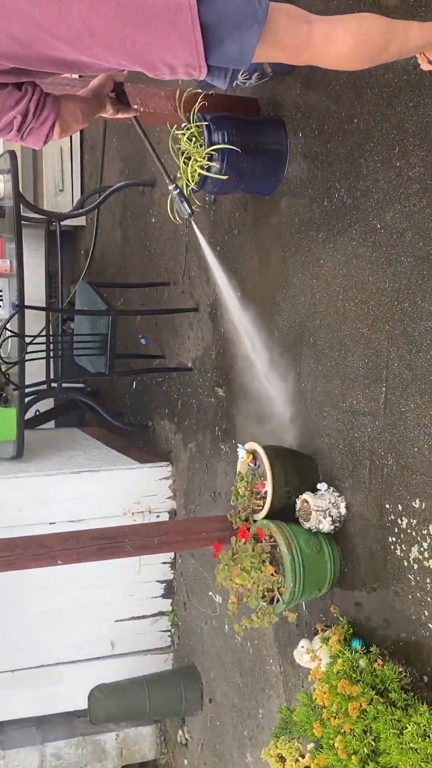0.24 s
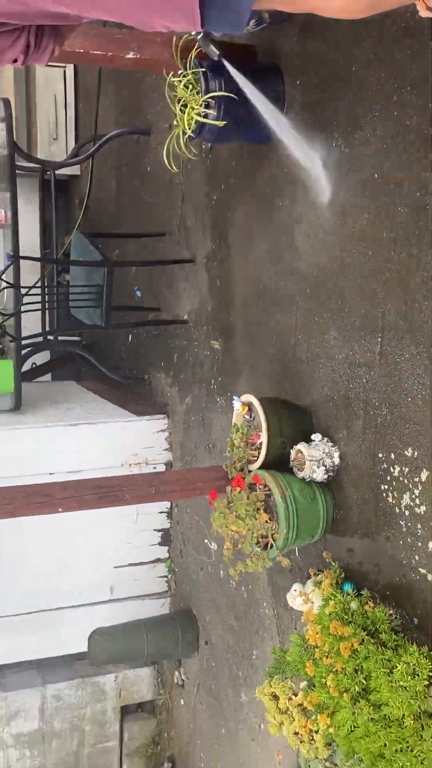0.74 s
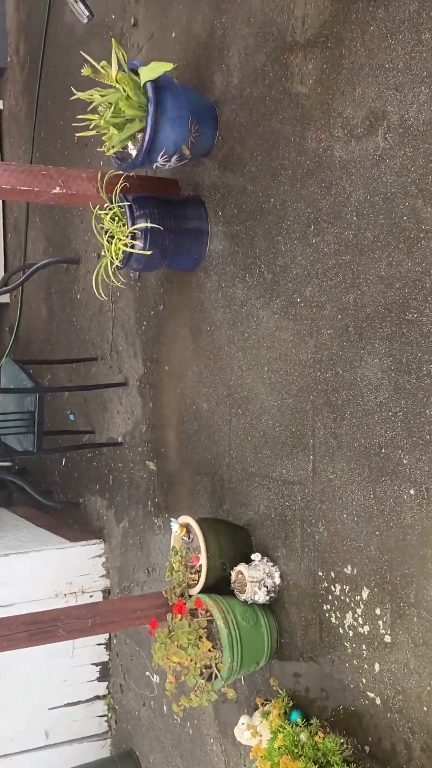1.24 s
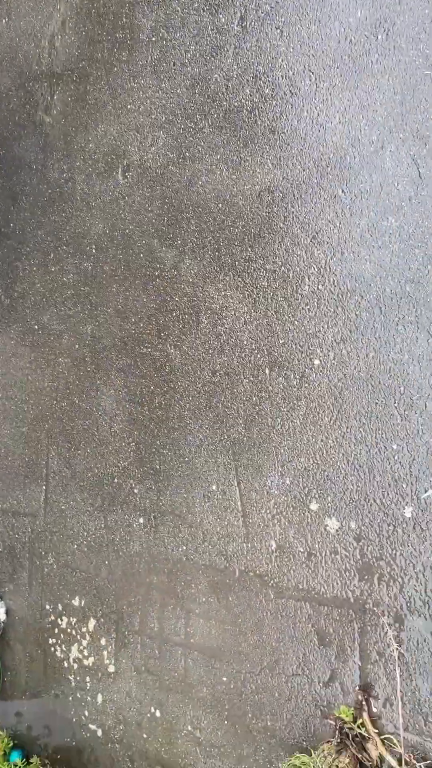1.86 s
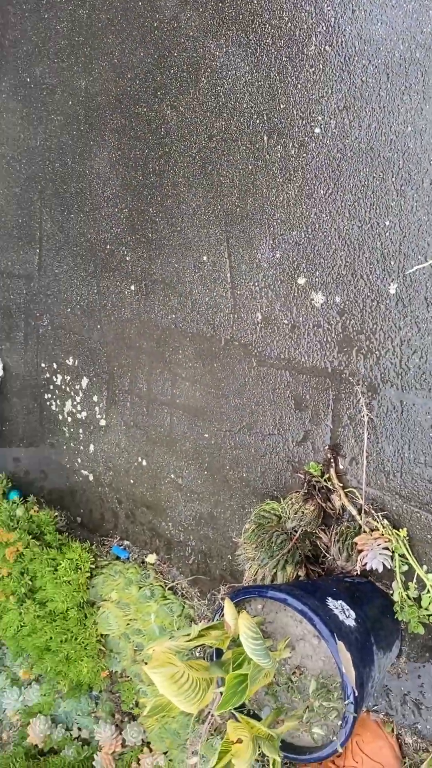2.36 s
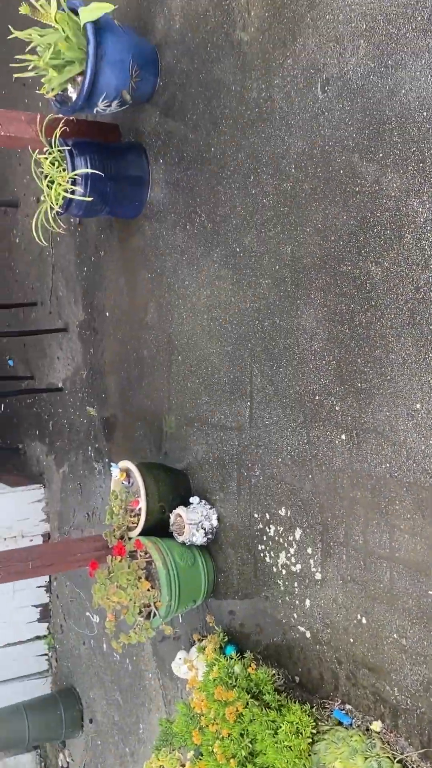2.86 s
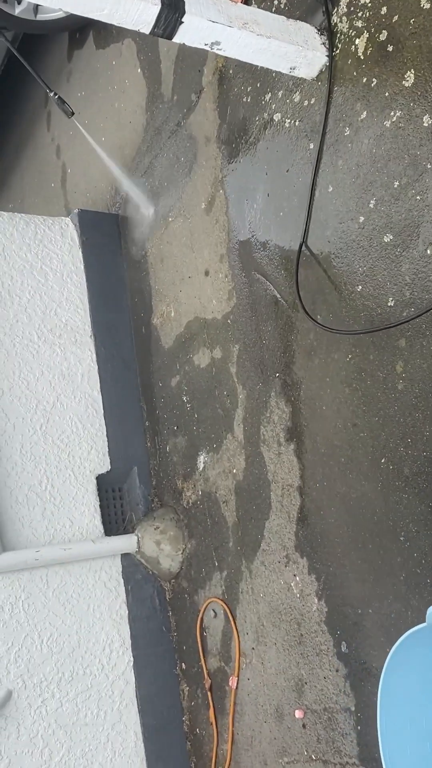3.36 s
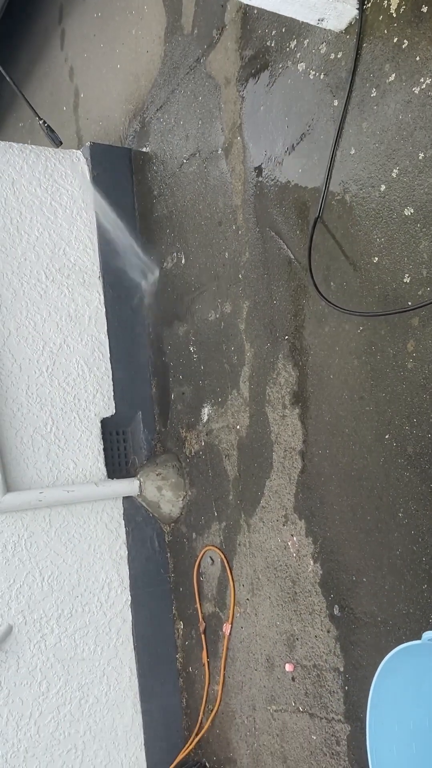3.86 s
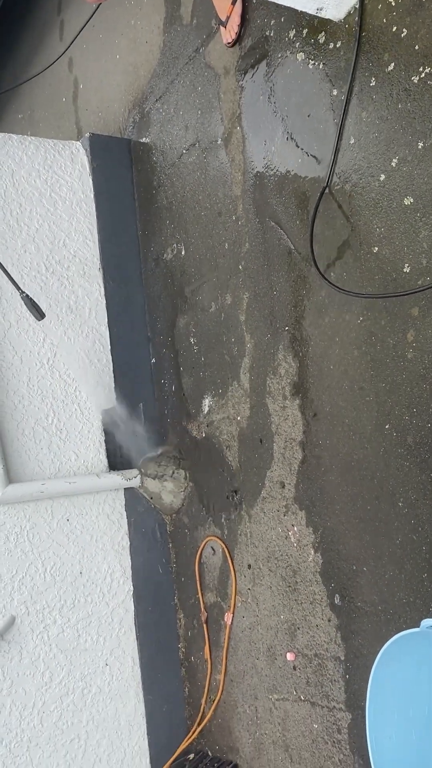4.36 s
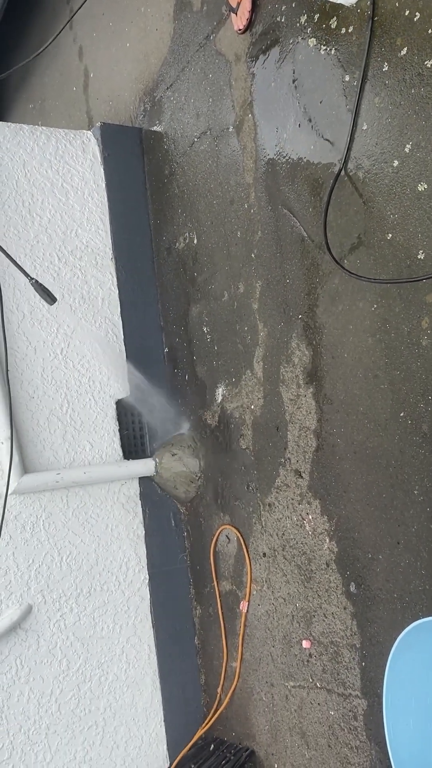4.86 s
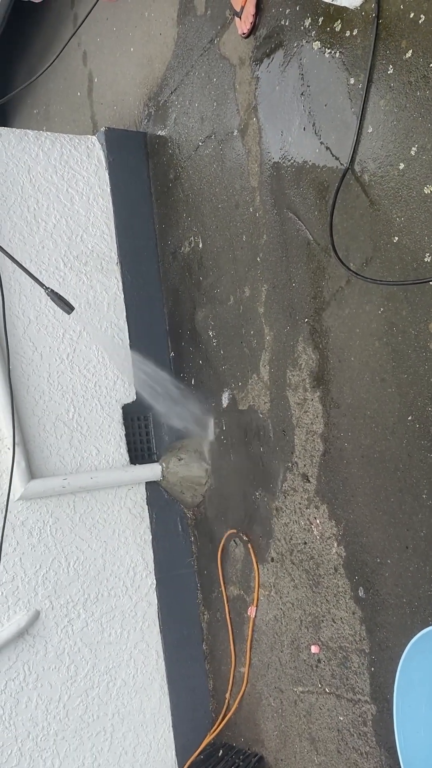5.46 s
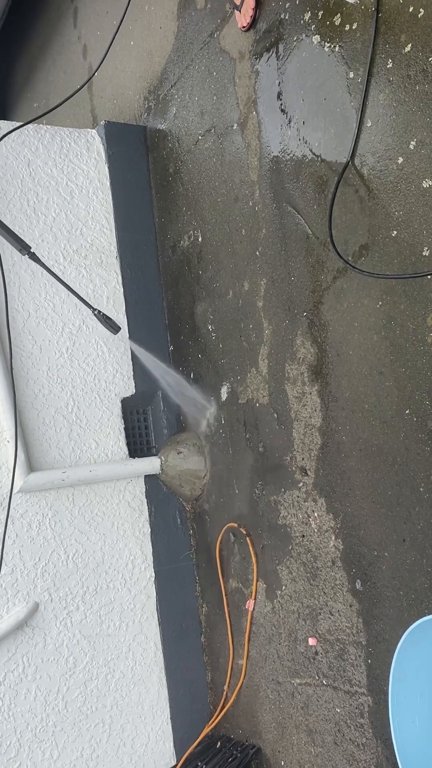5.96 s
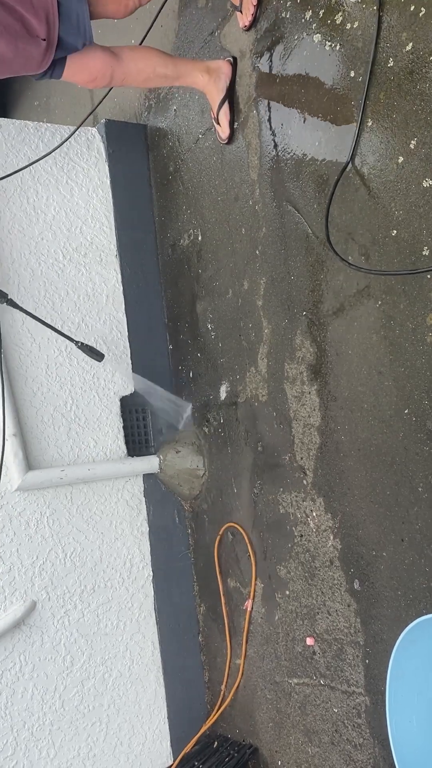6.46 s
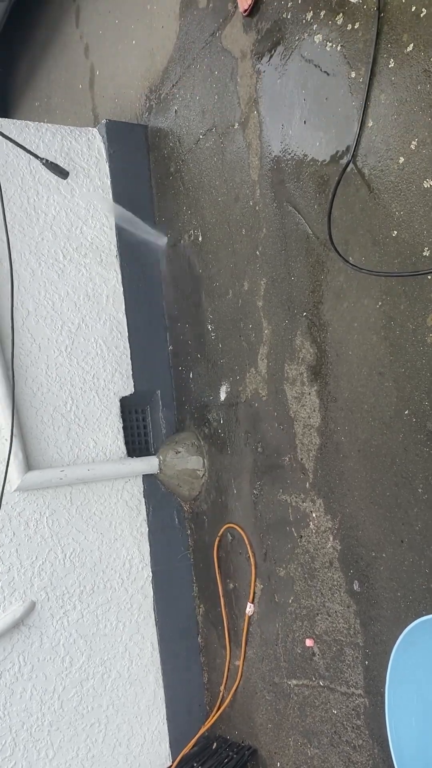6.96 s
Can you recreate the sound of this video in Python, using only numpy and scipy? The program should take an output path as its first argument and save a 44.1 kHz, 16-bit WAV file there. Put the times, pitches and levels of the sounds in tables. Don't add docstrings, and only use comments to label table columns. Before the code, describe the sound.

Outdoors, a pressure washer's jet hisses on concrete, cuts out for two seconds of gritty scuffs and plastic knocks, then whines loudly close by.

```python
import sys
import numpy as np
from scipy import signal
from scipy.fft import rfft, irfft, next_fast_len
from scipy.io import wavfile
from scipy.ndimage import uniform_filter1d

SR = 44100
rng = np.random.default_rng(int(sys.argv[2]) if len(sys.argv) > 2 else 0)


def output_pcm(signal):
    pcm = np.clip(np.atleast_2d(signal).T, -1, 1) * 32767
    wavfile.write(sys.argv[1], SR, np.round(pcm).astype(np.int16))


def volts_from_decibels(level):
    exponent = np.asarray(level, float) / 20
    return 10 ** exponent


N = 318402
TIME = np.arange(N) / SR
AIR = []


# start_s, rise_s, stop_s, case_db, jet_db
FAR_RUN = (-.01, .01, 1.035, -38.4, -36.5)
# pitch_hz, level_db, side_minus_mid_db
FAR_LINES = [(282.4, -56.5, -31.0), (832, -54.5, -14.0), (1112, -52.5, -17), (1226, -54, -16.0),
             (1397, -55, -21.0), (1507, -52, -4), (1674.0, -53, -3), (1934, -55.0, -2), (2095, -62, 5),
             (2590, -56.0, -3.0), (2664.0, -58, -3.0), (2793.0, -59, -6.0), (3354.0, -59.0, -11),
             (4192.0, -63.0, -7)]
# pitch_hz, level_db (per Hz)
FAR_CASE = [(88, -42), (150, -13.5), (270, -4), (605, -8), (1370, 0.5), (1820, -3), (1960, -6.5),
            (2400, -3), (2580, -11), (2910, -8.5), (5000, -21), (6500, -44), (11000, -120)]
# pitch_hz, width_hz, level_db
FAR_MODES = [(1130, 51, 1), (1250, 71, 3), (1420, 66, 1.5), (1670, 60, 2), (1800, 80, -1.5), (1960, 120, 2),
             (2450, 80, -3.5), (2580, 110, 5)]
# pitch_hz, level_db (per Hz)
FAR_JET = [(2060, -15), (3500, -2), (4340, -1.5), (4810, -2), (7800, -0.5), (14000, 2.5), (15750, 1.5),
           (16000, -23)]
# pitch_hz, side_minus_mid_db
FAR_SIDE = [(60, -15), (200, -18), (700, -13), (1290, -10), (2380, -2.5), (4400, -1.5), (7000, -4),
            (8000, -15), (8800, -23), (15000, -50)]


def far_washer():
    lines = [(hz, db, side_db, 0) for hz, db, side_db in FAR_LINES]
    return washer(FAR_RUN, lines, FAR_CASE, FAR_MODES, FAR_JET, FAR_SIDE,
                  case_share_db=-1.5, swell_db=1.0)


# start_s, rise_s, stop_s, case_db, jet_db
NEAR_RUN = (3.046, .028, 9, -28.4, -33)
NEAR_LINE_HZ = [279.6, 400, 559, 679.5, 838.5, 1118.8, 1303, 1398.4, 1506.4, 1677.9, 1783.5, 1956.8, 2211.7,
                2356, 2514, 2901, 3360, 3463, 3628, 3908, 4195, 5030, 7784]
# level_db, side_minus_mid_db, extra_db (until the phone settles)
NEAR_LINES = [(-42, -51, 0.5), (-49.5, -31, 2), (-55.5, -13, 0), (-54.5, -15, 0), (-50.5, -5, 7),
              (-40, -16, -4), (-54, -25, 6), (-41, -14, -3), (-39.5, -16, -4), (-40, -18, -7),
              (-43, -14, 2), (-45.5, 3, 0.5), (-52, -14, 3), (-62, -8, -2), (-48.5, -2, -1),
              (-46, -13, 0.5), (-51, -10, 0), (-54, -9, -3), (-50, -9, 0), (-55, -6, 2), (-49, -8, 1),
              (-53, -1, 2), (-59, -15, 2)]
# pitch_hz, level_db (per Hz)
NEAR_CASE = [(88, -88), (150, -22.5), (226, -20.5), (274, -12.5), (341, -13.5), (395, -15), (613, -13.5),
             (1040, -6), (1100, -4), (1280, -8.5), (1460, -2), (2070, -5.5), (5000, -15), (6500, -49),
             (11000, -120)]
# pitch_hz, width_hz, level_db
NEAR_MODES = [(1060, 20, 0), (1182, 59, 2), (1393, 60, 5.5), (1504, 38, 5.5), (1603, 57, -6), (1680, 50, 3),
              (1730, 35, 2.5), (1920, 25, 3), (2000, 80, -6.5), (2260, 66, 1.5), (2270, 36, -8.5),
              (3200, 85, 3), (12000, 200, 2.5), (7780, 90, 5), (8110, 50, 3)]
# pitch_hz, level_db (per Hz)
NEAR_JET = [(2060, -20), (3500, -2.5), (4160, -5), (4780, -7), (5190, 0), (7040, -2), (7850, -5),
            (8910, -4), (13000, 0), (15750, -0.5), (16000, -26)]
# pitch_hz, side_minus_mid_db
NEAR_SIDE = [(60, -21), (200, -45), (500, -24), (800, -16), (1290, -14), (2000, -8.5), (4400, -6),
             (7000, 0), (8000, -10), (8800, -11.5), (15000, -17.5)]


def near_washer():
    lines = [(hz, *strength) for hz, strength in zip(NEAR_LINE_HZ, NEAR_LINES)]
    return washer(NEAR_RUN, lines, NEAR_CASE, NEAR_MODES, NEAR_JET, NEAR_SIDE,
                  case_share_db=-3.5, swell_db=1.5)


def washer(run, lines, case, modes, jet, side_table, case_share_db, swell_db):
    sway_db, recede_db_per_s, jet_shut_db_per_s = 0.4, 0.2, 240
    run_down_db_per_s, brake_db_per_s2 = 80, 650
    start, rise, stop, case_db, jet_db = run
    on = np.clip((TIME - start) / rise, 0, 1)
    since_stop = np.maximum(TIME - stop, 0)
    run_down_db = (run_down_db_per_s + brake_db_per_s2 * since_stop) * since_stop
    load = on * volts_from_decibels(sway_db * walk(3) - recede_db_per_s * (TIME - start) - run_down_db)
    flow = on * volts_from_decibels(sway_db * walk(3) - jet_shut_db_per_s * since_stop)
    heard = slice(*np.flatnonzero(load > 1e-3)[[0, -1]])
    tones = motor(lines, heard, wobble=0.001215, rough_db=2, swell_db=swell_db) * load
    rattle = aim(unit(hiss(case, 1.0, 6), 730, 2200)) * load * volts_from_decibels(case_db + case_share_db)
    spray = aim(unit(hiss(jet, 0.63, 9), 4400, 14800)) * flow * volts_from_decibels(jet_db)
    mid, other = shape(rattle + spray, [(20, 0), (20000, 0)], modes)
    return tones + widen(mid, side_table, other)


# time_s, level_db
WALL_ECHO = [(3.6, 0), (4.8, -1), (5.3, -5), (5.9, -7), (6.15, 1), (6.35, 4.5), (6.6, 1.5), (7.2, -1)]


def motor(lines, span, wobble, rough_db, swell_db):
    settled_s, settling_s = 3.66, 0.34
    time = TIME[span]
    turn = (np.cumsum(1 + wobble * (walk(3) + walk(25))) / SR)[span]
    unsettled = np.clip((settled_s - time) / settling_s, 0, 1)
    out = np.zeros((2, N))
    for hz, db, side_db, early_db in lines:
        unsteady = min(hz / 1300, 1)
        smear = 0.55 * hz / 1500 * walk(40)[span]
        phase = 2 * np.pi * (hz * turn + rng.random()) + smear
        load = (walk(2.95, unsteady * swell_db) * walk(30, unsteady * rough_db))[span]
        load = load * (1 + (volts_from_decibels(early_db) - 1) * unsettled)
        if 500 < hz < 900 and hz % 280 > 270:
            load = load * volts_from_decibels(np.interp(time, *np.transpose(WALL_ECHO), left=0))
        gain = np.sqrt(2) * volts_from_decibels(db) * load
        mid = gain * np.sin(phase)
        side = gain * volts_from_decibels(side_db) * np.cos(phase)
        out[:, span] += [mid + side, mid - side]
    return out


# time_s, roar_db (on the concrete), bite_db (of the spray)
AIM = [(0, -.5, 0), (.3, 0, -1.5), (.55, 0, -1), (.85, 0, 1.5), (1, 0, .5), (3.1, 1.5, 1.5), (3.4, 0, 2),
       (4.2, -.5, .8), (4.7, .3, -.8), (5.3, -2, .1), (5.7, -2, .3), (6.15, -4.5, 1), (6.4, -1.5, 1),
       (6.8, .2, .1), (7.2, .2, .1)]


def aim(x):
    s, roar_db, bite_db = np.transpose(AIM)
    for db, band_hz in ((roar_db, [350, 1000]), (bite_db, [4000, 8000])):
        sos = signal.butter(1, band_hz, "bandpass", fs=SR, output="sos")
        part = signal.sosfilt(sos, x)
        x = x + part * (volts_from_decibels(np.interp(TIME, s, db)) - 1)
    return x


# start_s, end_s, level_db, pitch_hz, width_hz
VALVE = (1.074, 1.12, -46, 14200, 1100)


def valve():
    start, end, db, hz, width = VALVE
    whistle = shape(rng.standard_normal(N), [(20, -40), (20000, -40)], [(hz, width, 40)])
    gate = np.sin(np.pi * np.clip((TIME - start) / (end - start), 0, 1))
    return volts_from_decibels(db) * gate * whistle / np.std(whistle)


# start_s, level_db, pitch_hz, t60_s, damped_at_s
PUMP_RING = (1.06, -46.5, 1150, .9, 1.195)


def pump_ring():
    out, t = np.zeros(N), TIME[:16384]
    s, db, hz, t60, damped = PUMP_RING
    tone = ring(t, hz, t60) * walk(150)[:len(t)] + 0.6 * ring(t, hz, t60)
    gate = np.clip(np.minimum(t, damped - s - t) / 0.02, 0, 1)
    add(out, s, volts_from_decibels(db) * tone * gate)
    return out


# peak_s, peak_db, centre_hz, t60_s
SCUFFS = [
    (1.3444, -34, 7000, 0.07),
    (1.4905, -28.5, 8400, 0.031),
    (1.637, -29, 11000, 0.049),
    (1.7764, -27, 10800, 0.027),
    (1.939, -32.5, 11000, 0.047),
    (2.0737, -45, 10900, 0.06),
    (2.6794, -47, 9880, 0.03),
    (2.7105, -44, 8640, 0.066),
    (2.7776, -42, 9080, 0.056),
]
# peak_s, peak_db, centre_hz
FAINT_SCUFFS = [
    (1.4366, -53, 12800),
    (1.5773, -50, 14800),
    (1.722, -52, 13600),
    (1.8544, -55, 5070),
    (1.9964, -52, 11300),
    (2.173, -58, 8440),
    (2.3261, -48, 5650),
    (2.4289, -48, 8470),
    (2.495, -48, 5520),
    (2.6529, -43, 7000),
]
# peak_s, peak_db, centre_hz, t60_s
DRAGS = [
    (1.128, -42, 4600, 0.04),
    (1.2675, -49.5, 13100, 0.12),
    (1.3694, -50, 7550, 0.11),
    (2.09, -34.5, 7750, 0.042),
    (2.2482, -33, 6360, 0.15),
    (2.608, -39.5, 8300, 0.12),
    (2.9343, -32, 8700, 0.083),
    (2.9694, -42.5, 7300, 0.12),
]


def sole_on_grit():
    out = np.zeros(N)
    for s, db, hz, t60 in SCUFFS:
        add(out, s, scuff(db - 9.0, hz, t60, swell_ms=4.0, hold=0.0013, wide=0.78))
    for s, db, hz in FAINT_SCUFFS:
        add(out, s, scuff(db - 9.0, hz, t60=0.08, swell_ms=3.0, hold=0.0013, wide=0.78))
    for s, db, hz, t60 in DRAGS:
        add(out, s, scuff(db - 11.5, hz, t60, swell_ms=0.6, hold=0.013, wide=0.95))
    return np.roll(out, -int(0.028 * SR))


def scuff(db, hz, t60, swell_ms, hold, wide):
    t = TIME[:8192] - 0.03
    bins = np.arange(4097) * SR / 8192 + 1
    swell = np.exp(t * 1000 / max(swell_ms, 0.5))
    decay = np.exp(-np.log(1000) * (t - hold) / t60)
    envelope = np.minimum(np.minimum(swell, decay), 1)
    crackle = volts_from_decibels(2.1 * np.repeat(rng.exponential(size=256), 32))
    colour = np.exp(-(np.log(bins / hz) / 0.19) ** 2) + wide / (1 + (5500 / bins) ** 6)
    scrape_db = -1 - 16 * np.log2(hz / 5000)
    colour += volts_from_decibels(scrape_db) * np.exp(-(np.log(bins / 3200) / 0.6) ** 2)
    colour *= volts_from_decibels(3.5 * np.interp(bins, np.arange(24) * 1000, rng.standard_normal(24)))
    noise = crackle * irfft(rfft(rng.standard_normal(len(t))) * colour, len(t))
    return volts_from_decibels(db) * envelope * noise / np.std(noise)


# start_s, peak_db, pitch_hz
GRAINS = [(1.3514, -38, 7120), (1.4661, -47, 13900), (1.4925, -34, 9000), (1.6304, -34, 11500),
          (1.6382, -21, 9500), (1.6454, -33, 12800), (1.6594, -41, 10500), (1.7724, -27, 11000),
          (1.7784, -21, 10800), (1.8024, -46, 11100), (1.9365, -30, 10600), (1.939, -26, 11000),
          (1.9964, -45, 11300), (2.0737, -46, 7530), (2.0906, -28, 7620), (2.1034, -36, 8050),
          (2.2154, -48, 15000), (2.2478, -46, 6360), (2.2964, -44, 4770), (2.615, -42, 14500),
          (2.615, -45, 10000), (2.6529, -44, 4320), (2.7112, -43, 4210), (2.9357, -25, 8440)]


def snapping_grains():
    out, t = np.zeros(N), TIME[:512]
    for s, db, hz in GRAINS:
        burst = np.diff(rng.standard_normal(len(t) + 1)) * np.exp(-t / 0.00059)
        snap = 0.7 * ring(t, hz, 0.004) + 0.55 * burst
        add(out, s, volts_from_decibels(db - 5) * snap * (1 - np.exp(-t / 0.0003)))
    return out


# start_s, peak_db, lowest_hz
DRY_TICKS = [(1.2681, -54, 9000), (1.288, -54, 8000), (1.3449, -42, 3000), (1.372, -48, 5000),
             (1.4661, -46, 7000), (1.5774, -52, 4000), (1.66, -46, 3500), (1.7215, -48, 3500),
             (1.803, -48, 4000), (1.95, -42, 8000), (1.9964, -45, 2500), (2.0737, -44, 6000),
             (2.3262, -49, 3500), (2.4289, -48, 6000), (2.495, -50, 5000), (2.615, -41, 6000),
             (2.7113, -44, 3000), (2.9358, -37, 5000)]


def dry_ticks():
    out, t = np.zeros(N), TIME[:1024]
    for s, db, hz in DRY_TICKS:
        burst = rng.standard_normal(len(t)) * (np.exp(-t / 0.0007) + 0.2 * np.exp(-t / 0.004))
        sos = signal.butter(2, hz, "highpass", fs=SR, output="sos")
        add(out, s, volts_from_decibels(db - 4) * signal.sosfilt(sos, burst))
    return out


# start_s, level_db, pitch_hz, t60_s
CLINKS = [
    (1.646, -54, 13000, .03),
    (2.255, -59, 6350, .06),
    (2.601, -55, 7650, .3),
    (2.601, -57, 13500, .2),
    (2.601, -60, 3200, .1),
]


def clinks():
    out, t = np.zeros(N), TIME[:8192]
    for s, db, hz, t60 in CLINKS:
        add(out, s, volts_from_decibels(db) * ring(t, hz, t60) * volts_from_decibels(3.0 * walk(300)[:len(t)]))
    return out


# start_s, peak_db, rattle_db
KNOCKS = [
    (2.2743, -27.5, -30),
    (2.6535, -30.5, -7),
]
# pitch_hz, level_db, t60_s
KNOCK_MODES = [
    [(1023, -8, .03), (1260, 0, .023), (850, -16, .02), (1550, -9, .012)],
    [(851, -7, .035), (1389, -5, .04), (1873, 0, .024), (2200, -5, .02), (2730, -8, .014),
     (3499, -18, .008)],
]
# late_ms, share
BOUNCES = [
    [(0, 1.1), (3.2, .35), (6.4, .75), (11.1, .3), (16, .2), (24, .15), (31, .1)],
    [(0, .5), (1.6, .5), (3.7, .7), (5.3, .6), (8.2, .5), (11, .45), (14.5, .4), (19, .25), (25, .2),
     (32, .2), (42, .1), (59, .12), (63, .12)],
]
# start_s, peak_db, pitch_hz, t60_s
TAPS = [
    (.382, -28.5, 417, 0.03),
    (1.438, -43, 620, .016),
    (1.438, -46, 1250, .01),
    (1.885, -33.5, 300, 0.056),
    (3.01, -45, 1100, .04),
]


def knocks():
    out, t = np.zeros(N), TIME[:8192]
    no_bass = signal.butter(3, 700, "highpass", fs=SR, output="sos")
    for (s, db, rattle_db), modes, bounces in zip(KNOCKS, KNOCK_MODES, BOUNCES):
        body = sum(volts_from_decibels(mode_db) * ring(t[:4096], hz, t60) for hz, mode_db, t60 in modes)
        blow = 0.2 * volts_from_decibels(rattle_db) * rng.standard_normal(4096) * np.exp(-t[:4096] / 0.014)
        for ms, share in bounces:
            blow[int(ms * SR / 1000)] += share
        clack = signal.sosfilt(no_bass, np.convolve(body, blow))
        add(out, s, volts_from_decibels(db - 4.0) * clack)
    for s, db, hz, t60 in TAPS:
        overtones = 0.63 * ring(t, 1.7 * hz, t60) + 0.21 * ring(t, 3.5 * hz, t60 / 2)
        add(out, s, volts_from_decibels(db + 0.5) * (ring(t, hz, t60) + overtones))
    return signal.sosfilt(signal.butter(3, 150, "highpass", fs=SR, output="sos"), out)


# middle_s, peak_db, pitch_hz, half_length_ms
BUMPS = [(0.386, -33, 230, 5.1), (.408, -36, 300, 3), (.425, -38, 280, 3.5), (1.925, -38.5, 188, 4.7),
         (2.823, -34, 201, 4.9), (4.246, -31, 328, 6), (4.361, -25, 318, 5.7), (4.466, -23.5, 307, 5.6),
         (4.53, -29, 300, 5), (4.605, -24.5, 291, 12), (4.655, -30, 336, 5), (4.765, -29, 277, 7),
         (4.822, -28, 280, 8), (4.885, -30, 290, 6), (4.93, -31, 310, 6), (5.29, -31, 250, 8),
         (6.869, -33, 327, 5)]


def phone_bumps():
    out = np.zeros(N)
    for s, db, hz, half_ms in BUMPS:
        t = TIME - s
        out += volts_from_decibels(db) * np.cos(2 * np.pi * hz * t) * np.exp(-(t * 1000 / half_ms) ** 2)
    return out


# start_s, end_s, start_hz, end_hz, end_db
WHINE = [
    (.84, 1.76, 305, 484, -56),
    (3.68, 5.32, 472, 594, -47),
]


def vehicle():
    fade_s, nearing_db_per_s = 0.1, 3
    out = 0
    for start, end, start_hz, end_hz, db in WHINE:
        hz = np.interp(TIME, [start, end], [start_hz, end_hz])
        gate = np.clip(np.minimum(TIME - start, end - TIME) / fade_s, 0, 1)
        near_db = db - nearing_db_per_s * np.abs(end - TIME)
        level = gate * volts_from_decibels(near_db + 2.5 * walk(14))
        out = out + level * np.sin(2 * np.pi * np.cumsum(hz) / SR + 0.6 * walk(25))
    return out


# middle_s, level_db, half_length_s
GUSTS = [(0.0, -52, .14), (.1, -52, .03), (.29, -55, .08), (.41, -56, .03), (.88, -55.5, .15),
         (1.95, -57, .08), (2.25, -59, .1), (2.43, -59, .05), (2.9, -57, .04), (3.1, -55, .15),
         (3.6, -57, .4), (4.2, -51, .1), (4.4, -45.5, .16), (4.66, -45, .08), (4.86, -45, .1),
         (5.04, -48, .04), (5.18, -50, .1), (5.7, -59, .25), (6.45, -45.5, .05), (6.84, -44.5, .06)]
# pitch_hz, level_db (per Hz)
WIND_COLOUR = [(20, -42), (50, -42), (80, -37), (110, -35), (150, -13), (200, -2), (320, -0.5), (450, -9),
               (700, -14), (1500, -37)]
# pitch_hz, side_minus_mid_db
WIND_SIDE = [(25, -11), (60, -18), (125, -22), (300, -30)]


def wind():
    breeze_db = -62
    lumps = volts_from_decibels(1.5 * walk(22) + 2 * walk(60))
    strength = np.hypot(volts_from_decibels(breeze_db), swells(GUSTS))
    buffets = shape(lumps * rng.standard_normal((2, N)), WIND_COLOUR)
    mid, other = unit(buffets, 317, 348) * strength
    side = shape(other, WIND_SIDE)
    return np.array([mid + side, mid - side])


# middle_s, level_db, half_length_s
STIRS = [(1.12, -59, .05), (1.28, -64, .06), (1.39, -60, .05), (1.864, -57, .015), (1.945, -60, .025),
         (2.08, -60, .03), (2.3, -58, .06), (2.42, -56, .08), (2.51, -57, .05), (2.67, -53, .03),
         (2.74, -62, .05), (2.87, -66, .07), (2.975, -53, .035)]
# pitch_hz, level_db (per Hz)
HUSH = [(180, -13.5), (300, -2), (481, -9), (556, -11), (972, -9), (1290, -10.5), (1730, -17), (3000, -21),
        (3900, -27), (6600, -120)]
RUSTLE = [(1000, -35), (1600, -1), (2200, 1.5), (2900, -2), (4000, -12), (6500, -30)]
TRICKLE = [(2650, -17), (4500, 5), (6030, -2), (7770, -3), (10000, -7), (14200, -3), (16000, -7)]
# pitch_hz, side_minus_mid_db
YARD_SIDE = [(60, -11), (200, -22), (500, -8), (1290, -9), (2380, -2), (4400, 4), (7500, 2), (8800, -7),
             (15000, -11)]


def yard():
    rest_low_db, rest_top_db = -62, -76
    stir_low_db, stir_mid_db, stir_top_db = -10, -2.1, -12.5
    stir = swells(STIRS)
    low_level = np.hypot(volts_from_decibels(rest_low_db), volts_from_decibels(stir_low_db) * stir)
    top_level = np.hypot(volts_from_decibels(rest_top_db), volts_from_decibels(stir_top_db) * stir)
    hush = unit(hiss(HUSH, 1.1, 14), 500, 1800) * low_level
    rustle = unit(hiss(RUSTLE, 2.2, 30), 1800, 3500) * volts_from_decibels(stir_mid_db) * stir
    trickle = unit(hiss(TRICKLE, 3.5, 60), 5000, 15000) * top_level
    mid, other = hush + rustle + trickle
    return widen(mid, YARD_SIDE, other)


def swells(rows):
    coarse = TIME[::44]
    power = sum(volts_from_decibels(2 * db) * np.exp(-2 * ((coarse - s) / half) ** 2) for s, db, half in rows)
    return np.interp(TIME, coarse, np.sqrt(power))


# pitch_hz, level_db
LEAN = [(200, -0.5), (1500, 1.16), (4000, 2), (6500, 5), (9000, 0.7)]


def widen(mid, side_table, other):
    side = shape(other, side_table) + (shape(mid, LEAN) - mid) / 2
    return np.array([mid + side, mid - side])


def octaves():
    slopes = np.array([(0.5, -60), (0.704, -3), (1, 0), (1.42, -3), (2, -60)])
    centres_hz = 125 * 2.0 ** np.arange(8)
    return [shape(rng.standard_normal((2, N)), slopes * [hz, 1]) for hz in centres_hz]


def hiss(colour, flicker_db, rate):
    out = sum(walk(rate, flicker_db) * np.roll(band, rng.integers(N), axis=1) for band in AIR)
    return shape(out, colour)


def walk(rate, spread_db=None):
    hold = max(int(SR / 16 / rate), 1)
    steps = np.repeat(rng.standard_normal(N // 16 // hold + 2), hold)
    slow = 1.273 * uniform_filter1d(uniform_filter1d(steps, hold), hold)
    if spread_db is not None:
        slow = volts_from_decibels(spread_db * slow)
    return np.interp(np.arange(N) / 16, np.arange(len(slow)), slow)


def ring(t, hz, t60):
    return np.sin(2 * np.pi * hz * t) * np.exp(-np.log(1000) * t / t60)


def shape(x, table, modes=()):
    hz, db = np.transpose(table)
    size = next_fast_len(N)
    bins = np.arange(size // 2 + 1) * SR / size + 1
    gain_db = np.interp(np.log(bins), np.log(hz), db)
    gain_db += sum(mode_db * np.exp(-((bins - f) / width) ** 2) for f, width, mode_db in modes)
    return irfft(rfft(x, size) * volts_from_decibels(gain_db), size)[..., :N]


def unit(x, lo_hz, hi_hz):
    sos = signal.butter(4, [lo_hz, hi_hz], "bandpass", fs=SR, output="sos")
    return x / np.std(signal.sosfilt(sos, x[0]))


def add(out, s, x):
    i = int(s * SR)
    out[i:i + len(x)] += x[:len(out) - i]


def scene():
    AIR[:] = octaves()
    grit = sole_on_grit() + snapping_grains() + dry_ticks() + clinks()
    small = grit + knocks() + phone_bumps() + valve() + pump_ring()
    echo = volts_from_decibels(-4) * np.roll(small, 90)
    washers = far_washer() + near_washer()
    return washers + widen(small, YARD_SIDE, echo) + vehicle() + wind() + yard()


def band_limit(x):
    return signal.sosfilt(signal.butter(12, 17080, fs=SR, output="sos"), x)


def record(dry):
    top_cut = signal.ellip(12, 0.3, 70, 15800, fs=SR, output="sos")
    mix = signal.sosfilt(top_cut, dry)
    return band_limit(mix)


dry = scene()
out = record(dry)
output_pcm(out)
```